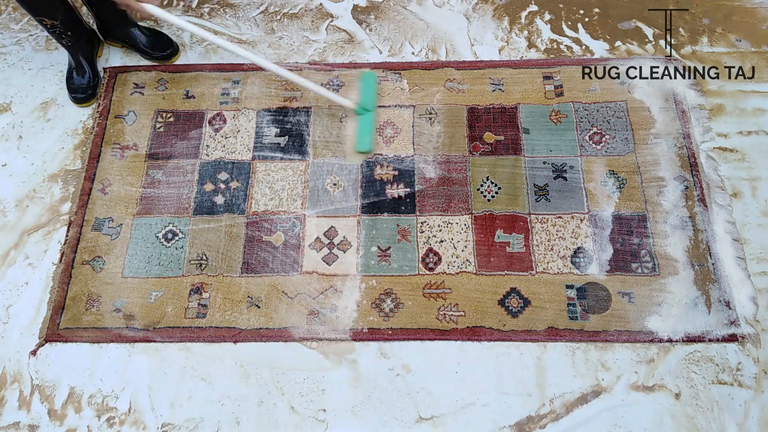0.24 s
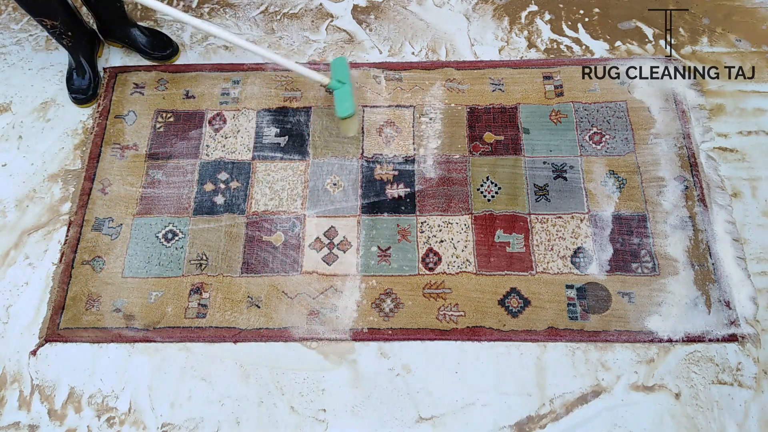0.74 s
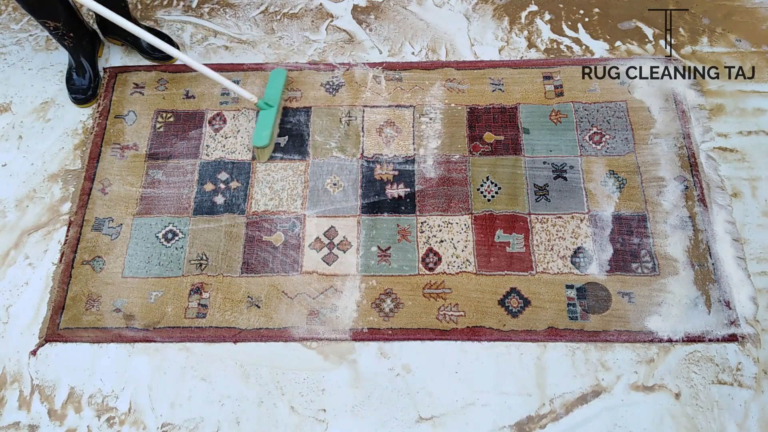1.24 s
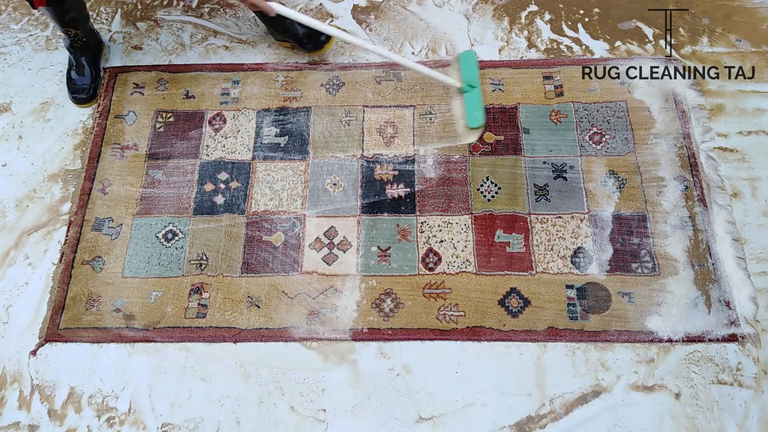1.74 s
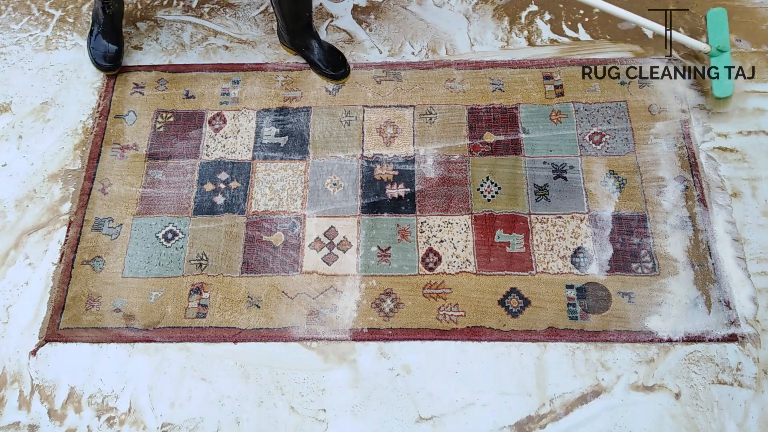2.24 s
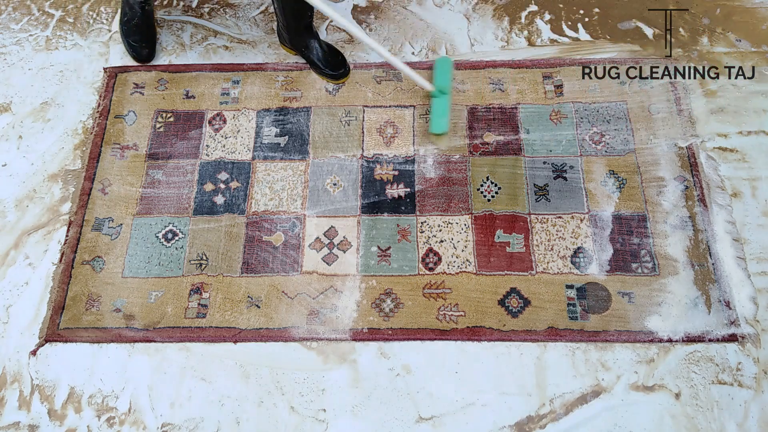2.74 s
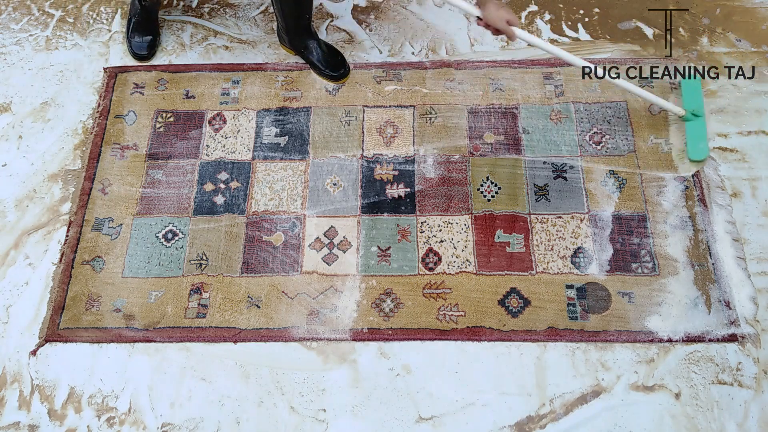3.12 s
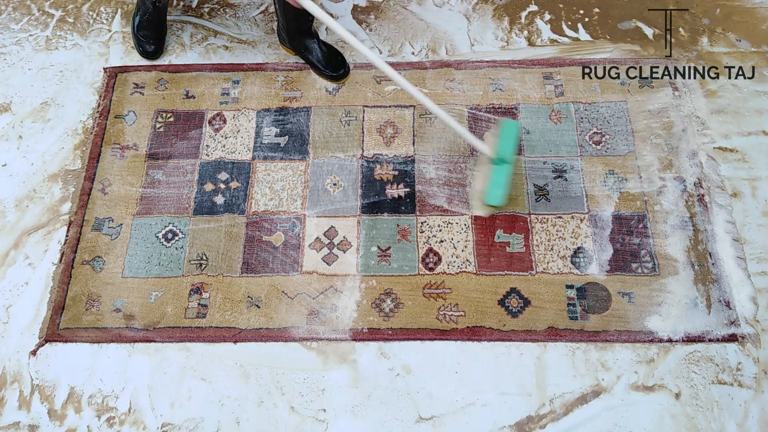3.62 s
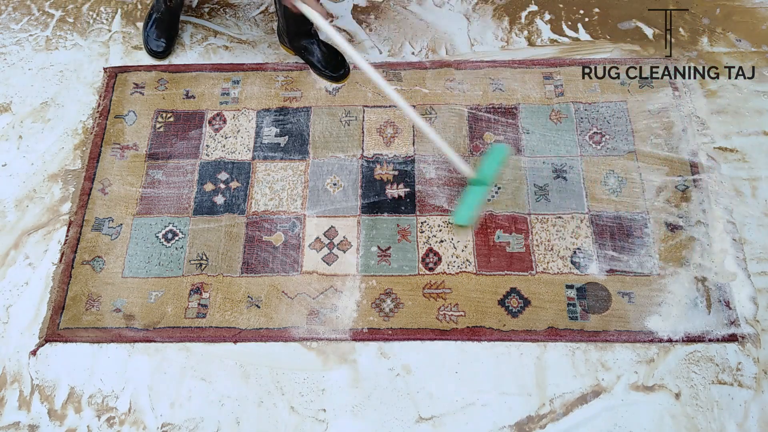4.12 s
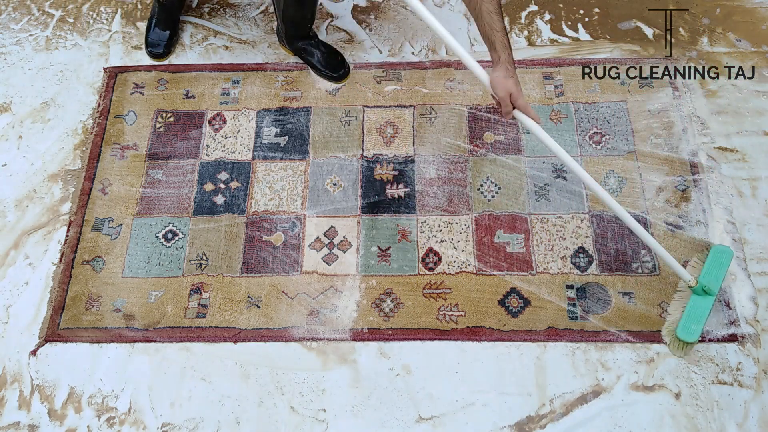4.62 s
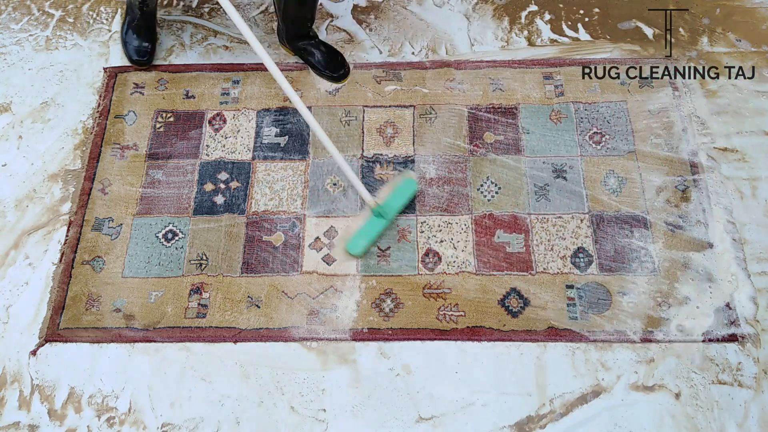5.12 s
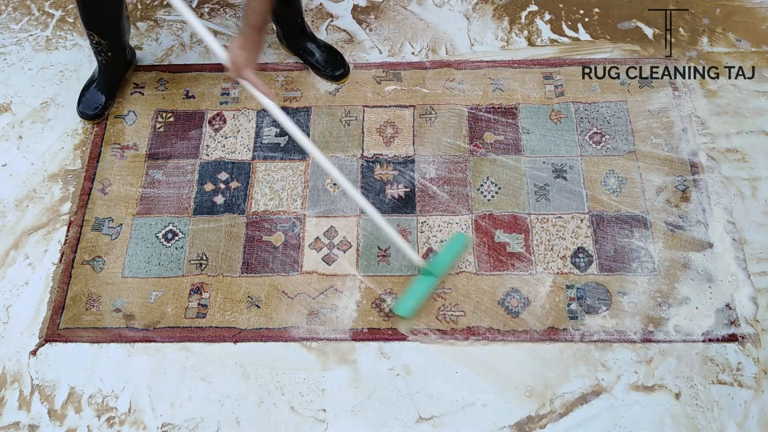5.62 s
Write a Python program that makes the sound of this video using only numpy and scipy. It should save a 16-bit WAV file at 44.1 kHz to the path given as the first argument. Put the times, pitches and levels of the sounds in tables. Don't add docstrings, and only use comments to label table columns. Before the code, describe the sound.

Dry-edged, grainy bristle rasp over wet pile, picked up in mono. Short strokes first, then the brush head claps the floor with a brief room tail. After a near-silent gap come a softer drag and light dabs, then regular scrubbing about every third of a second, with one bright wet slap around four seconds. Low boot shuffles, slight chirps and a faint distant machine tone leak through the noise reduction.

```python
import sys
import numpy as np
from scipy import signal
from scipy.io import wavfile

SR = 44100
rng = np.random.default_rng(int(sys.argv[2]) if len(sys.argv) > 2 else 0)


def generate_wav(signal):
    frames = np.transpose(np.atleast_2d(signal))
    scaled = np.clip(frames, -1, 1) * 32767
    pcm = np.round(scaled).astype(np.int16)
    wavfile.write(sys.argv[1], SR, pcm)


def rack_gain(trim_db):
    fader = np.asarray(trim_db, float)
    return 10 ** (fader / 20)


N = 258426
T = np.arange(N) / SR


def rms_one(x):
    return x / np.sqrt(np.mean(x ** 2) + 1e-20)


def at_hz(points, hz, column=1):
    points = np.array(points)
    return np.interp(np.log(hz), np.log(points[:, 0]), points[:, column])


def drift(rate_hz):
    hop, warm_up = 40, 2000
    r = np.exp(-2 * np.pi * rate_hz * hop / SR)
    chance = rng.standard_normal(N // hop + 2 + warm_up)
    slow = signal.lfilter([1], [1, -2 * r, r * r], chance)[warm_up:]
    return np.interp(np.arange(N) / hop, np.arange(len(slow)), rms_one(slow))


def butter(x, order, hz, kind):
    return signal.sosfilt(signal.butter(order, hz, kind, fs=SR, output="sos"), x)


def ring(clicks, hz, t60):
    r, w = rack_gain(-60 / (t60 * SR)), 2 * np.pi * hz / SR
    return signal.lfilter([0, np.sin(w)], [1, -2 * r * np.cos(w), r * r], clicks + 1e-18)


def resonance(x, hz, width_hz):
    r = np.exp(-np.pi * width_hz / SR)
    top = np.array([1, 0, -1]) * (1 - r * r) / 2
    return signal.lfilter(top, [1, -2 * r * np.cos(2 * np.pi * hz / SR), r * r], x)


def bands(sources, low_hz, high_hz):
    edges = np.geomspace(low_hz, high_hz, int(4 * np.log2(high_hz / low_hz)) + 1)
    for k, (low, high) in enumerate(zip(edges, edges[1:])):
        yield np.sqrt(low * high), butter(sources[k % 2], 3, [low, high], "band")


def onset(since, rise_s):
    return 1 - np.exp(-np.clip(since, 0, 9) / max(rise_s, 1e-4))


def swell(s, length):
    return np.sin(np.pi * np.clip((T - s) / length, 0, 1)) ** .5


def motion():
    # start in seconds, end in seconds, top rasp in dB, speed-up in seconds, braking in seconds
    strokes = [(-.06, 0.12, -35.5, 0.0091, 0.22), (-0.004, 0.424, -37, 0.16, 0.07),
               (0.404, 0.507, -50, .007, 0.096), (0.475, 0.687, -39, 0.022, .065),
               (0.873, 0.923, -34.5, 0.0047, .001), (1.258, 1.46, -57, 0.0039, 0.31),
               (1.345, 1.444, -59, .1, 0.011), (1.396, 2.168, -40, 0.04, 0.053),
               (2.374, 2.43, -49, 0.0064, .05), (2.408, 2.455, -52, .006, .03),
               (2.436, 2.533, -62.5, .01, 0.016), (2.465, 2.844, -36, 0.29, 0.099),
               (2.852, 3.221, -35, 0.1, .35), (3.179, 3.538, -34, 0.19, 0.08),
               (3.538, 3.938, -35.5, 0.055, 0.12), (3.914, 4.003, -55.5, .026, 0.0044),
               (3.98, 4.266, -34.5, 0.033, 0.033), (4.259, 4.678, -35, 0.14, 0.16),
               (4.682, 4.754, -62, .002, .026), (4.734, 5.063, -34, 0.023, 0.042),
               (5.039, 5.444, -35, 0.15, 0.11), (5.417, 5.56, -47.5, 0.089, 0.012),
               (5.511, 5.91, -34, 0.045, 0.062)]
    # delay in seconds until the pile bites, the same for the backing,
    # then pile drag, deep drag and foam hiss in dB re rasp
    grip = [(.01, .01, -6.5, -13, -7.5), (0.015, 0.031, -5.5, -13.5, -11.5), (0.0084, .01, 0.5, -16, -11),
            (.01, 0.018, -4.5, -18.5, -9.5), (.001, .001, -4, -8.5, -7.5), (.001, .001, -27, -13, -12),
            (.001, .001, -33, -20, -10), (0.06, .33, -9.5, -13, -11.5), (.001, .001, -14.5, -38.5, -16),
            (.001, 0.00084, -0.5, -35, -17), (0.00085, .001, 4.5, -33, -19),
            (0.057, 0.067, -3, -10.5, -12.5), (0.037, 0.11, -6.5, -17, -12),
            (0.047, 0.046, -6.5, -17, -11.5), (0.023, 0.031, -6.5, -26.5, -12.5),
            (0.014, .01, -21, -41, -14.5), (0.012, 0.012, -6, -11.5, -10.5),
            (0.058, 0.084, -5.5, -20.5, -11.5), (.01, .01, -24, -30, -11), (0.012, 0.056, -8.5, -12, -11),
            (0.055, .075, -8.5, -26, -9.5), (.01, .01, -44.5, -34, -7), (0.017, 0.24, -8, -8.5, -9)]
    speed_power = 3.87
    deep_follows, pile_follows = -.05, -0.011
    skim_deep_db, skim_pile_db = -15, -24
    bite_s, bite_share = 0.0082, 0.1
    settle_db, settle_db_per_s = -8.5, 205.5

    power = np.zeros((4, N)) + 1e-12
    for (start, end, db, rise_s, brake_s), (pile_s, deep_s, pile_db, deep_db, hiss_db) in zip(strokes, grip):
        at = slice(max(int(start * SR), 0), int(end * SR))
        since = T[at] - start
        speed = (onset(since, rise_s) * onset(end - T[at], brake_s)) ** speed_power
        speed = speed / speed.max() + 1e-9
        deep_bite = onset(since - deep_s, bite_s + bite_share * deep_s) ** 2
        pile_bite = onset(since - pile_s, bite_s + bite_share * pile_s) ** 2
        deep = rack_gain(2 * skim_deep_db) + deep_bite * speed ** deep_follows
        pile = rack_gain(2 * skim_pile_db) + pile_bite * speed ** pile_follows
        even = np.ones_like(speed)
        shares = [even, rack_gain(2 * deep_db) * deep, rack_gain(2 * pile_db) * pile, rack_gain(2 * hiss_db) * even]
        power[:, at] += rack_gain(2 * db) * speed * shares
    keep = rack_gain(-2 * settle_db_per_s / SR)
    settling = signal.lfilter([1 - keep], [1, -keep], power)
    level = 10 * np.log10(power + rack_gain(2 * settle_db) * settling)
    return level[0], *(level[1:] - level[0])


def slips(per_s, spread_db):
    sizes = rack_gain(spread_db * np.minimum(rng.exponential(1, (2, N)), 4)) * rng.choice([-1, 1], (2, N))
    return rms_one(sizes * (rng.random((2, N)) < per_s / SR))


def brush(rasp_db, deep, pile, hiss):
    control_hz = [420, 850, 2100, 3600, 6000, 10000]
    # frequency in Hz, level in dB per Hz
    rasp_colour = [(150, -57), (250, -33), (301, -18), (445, 0.5), (485, 3.5), (909, -1), (1190, -2.5),
                   (2060, -4.5), (2790, -7.5), (5410, -10.5), (7600, -17), (8280, -14.5), (10100, -12.5),
                   (13800, -10.5), (14500, -15)]
    # frequency in Hz, width in Hz, level in dB
    head_modes = [(464, 230, -35.5), (900, 23, -22.5), (1955, 450, -7), (3730, 1100, -5), (5500, 1400, -5),
                  (13800, 570, -3.5)]

    scrape = 0.78 * np.minimum(pile + 15, 0)
    rasp = 0 * deep
    tilt = np.array([deep + 6, pile + 4.5, scrape, rasp, rasp, hiss + 7])
    clicks = slips(per_s=14000, spread_db=0.0)
    clicks = clicks + sum(rack_gain(db) * resonance(clicks, hz, width) for hz, width, db in head_modes)
    steady, played, judder = 0, 0, drift(19)
    for hz, band in bands(clicks, 240, 15000):
        place = np.interp(np.log(hz), np.log(control_hz), np.arange(len(control_hz)))
        k = min(int(place), len(control_hz) - 2)
        shift_db = tilt[k] + (place - k) * (tilt[k + 1] - tilt[k])
        band = band * rack_gain(at_hz(rasp_colour, hz))
        steady = steady + band
        played = played + band * rack_gain(shift_db + 0.6 * judder + 1.45 * drift(6.4))
    return played / steady.std() * rack_gain(rasp_db + 3.0)


def boots(rasp_db):
    # time in seconds, thud in dB, shuffle in dB, width in seconds
    weight_shifts = [(.0, -80, -47, 0.027), (.108, -60, -50, 0.06), (.33, -79, -60.5, 0.1),
                     (.55, -81, -62.5, 0.1), (1.219, -88, -70, 0.026), (2.8, -76, -67, .03),
                     (3.25, -57, -97, 0.057), (3.41, -74, -79, 0.017), (4.155, -72, -54, .03),
                     (4.2, -56.5, -62.5, 0.077), (4.4, -73, -106, .06), (5.72, -71, -86, 0.025)]
    push = rack_gain(rasp_db - rasp_db.max())
    thud_gain, shuffle_gain = rack_gain(-70.5) * push, rack_gain(-69.5) * push
    for s, thud_db, shuffle_db, width_s in weight_shifts:
        weight = np.exp(-((T - s) / width_s) ** 2)
        thud_gain = thud_gain + rack_gain(thud_db) * weight
        shuffle_gain = shuffle_gain + rack_gain(shuffle_db) * weight
    white = rng.standard_normal((2, N))
    thud = rms_one(butter(white[0], 2, [55, 125], "band"))
    shuffle = rms_one(butter(white[1], 2, [200, 370], "band"))
    return thud_gain * thud + shuffle_gain * rack_gain(2.0 * drift(45)) * shuffle


def room_floor():
    # frequency in Hz, level in dB per Hz
    floor_colour = [(15, -48), (25, -27.5), (54, -6), (216, -8), (282, -8.5), (679, -14), (1130, -17),
                    (1290, -6.5), (1470, -23.5), (8510, -35), (14500, -27)]
    # start in seconds, length in seconds, level in dB
    whine = [
        (.66, 0.12, -69),
        (0.854, .03, -76),
        (1.094, 0.042, -72),
        (1.228, .06, -68.5),
        (1.362, 0.071, -76.5),
        (1.425, 0.073, -57),
        (2.14, 0.19, -70),
    ]
    whine_hz, whine_width_hz = 1280, 68

    noise = 0
    for hz, band in bands(rng.standard_normal((2, N)), 25, 15000):
        noise = noise + band * rack_gain(at_hz(floor_colour, hz) + 2.4 * drift(9.1))
    tone = resonance(rng.standard_normal(N), whine_hz, whine_width_hz)
    tone = resonance(tone, whine_hz, whine_width_hz)
    leaking = sum(rack_gain(db) * swell(s, length) for s, length, db in whine)
    return rack_gain(-71.5) * rms_one(noise) + leaking * rms_one(tone)


def leaks():
    # start in seconds, length in seconds, frequency in Hz, level in dB
    strips = [(0.694, 0.072, 580, -67), (0.682, 0.073, 935, -66.5), (0.722, 0.071, 1150, -70),
              (1.217, 0.027, 398, -63.5), (1.259, 0.045, 619, -60), (1.262, .04, 1004, -65.5),
              (1.274, .03, 1680, -65), (1.298, .03, 2200, -71), (1.306, 0.034, 2900, -73),
              (1.288, .05, 3300, -74), (1.31, .06, 3800, -94), (4.47, .09, 402, -54.5),
              (1.604, 0.21, 604, -56.5), (1.822, 0.077, 387, -59), (1.902, 0.093, 450, -48.5),
              (2.16, 0.052, 520, -70), (2.375, 0.023, 900, -65), (2.383, 0.022, 3360, -58),
              (2.376, .025, 4900, -56.5), (2.415, 0.019, 1120, -60.5), (2.415, 0.02, 1610, -54),
              (2.419, 0.017, 2030, -56), (2.455, 0.028, 1140, -70), (2.559, .03, 484, -41.5),
              (2.915, 0.039, 483, -49.5), (4.757, .04, 765, -40), (1.305, 0.037, 590, -67.5),
              (5.072, .06, 440, -60.5), (5.222, 0.059, 406, -56.5), (5.55, .05, 536, -50)]
    out, white = np.zeros(N), rng.standard_normal(N)
    for s, length, hz, db in strips:
        at = slice(int((s - .5) * SR), int((s + .5) * SR))
        strip = resonance(resonance(white[at], hz, width_hz=62), hz, width_hz=71)
        out[at] += rack_gain(db) * swell(s, length)[at] * rms_one(strip)
    return out


def knock():
    # time in seconds, peak in dB
    contacts = [
        (0.903, -22),
        (.9062, -9),
        (0.9091, -8),
        (0.9116, -12),
        (0.9135, -27),
        (0.916, -23.5),
        (0.917, -26),
        (0.9201, -27.5),
        (.9250, -18.5),
        (.9300, -16),
    ]
    # frequency in Hz, level in dB, t60 in seconds
    block_modes = [(201, -22, .15), (372, -35, 0.037), (416, -22.5, .08), (480, -11.5, .1),
                   (534, -19, 0.11), (698, -18, 0.13), (795, -19.5, 0.035), (1060, -21, 0.044),
                   (1350, -15, 0.038), (1580, -23, .05), (2160, -27, 0.057), (3300, -18.5, 0.036),
                   (3846, -20.5, .04), (5840, -28, 0.025)]
    # frequency in Hz, level in dB, t60 in seconds
    room_tail = [(100, -64, 0.77), (246.4, -50, 0.35), (500, -37, 0.26), (1000, -51, 0.42),
                 (1987, -52, 0.28), (4000, -45.5, 0.26), (8000, -57.5, 0.28), (14000, -54.5, 0.26)]

    clicks = np.zeros(N)
    clicks[[round(s * SR) for s, db in contacts]] = -rack_gain(np.array(contacts)[:, 1])
    push = butter(clicks, 2, [400, 2200], "band") * rack_gain(16.5)
    body = sum(rack_gain(db) * ring(clicks, hz, t60) for hz, db, t60 in block_modes)
    since = T - contacts[1][0] + 0.001
    fade = 60 * np.abs(since)
    crack_noise = rms_one(resonance(rng.standard_normal(N), 4900, 6000))
    crack = (since > 0) * rack_gain(-22.5 - fade / 0.017) * crack_noise
    squeeze = rack_gain(-13) * np.sin(np.pi * np.clip(since / 0.0009, 0, 1)) ** 2
    rise = np.clip(since / 0.00033, 0, 1)
    tail = 0
    for hz, band in bands(rng.standard_normal((2, N)), 60, 15000):
        tail = tail + rms_one(band) * rack_gain(at_hz(room_tail, hz) - fade / at_hz(room_tail, hz, column=2))
    blow = butter(squeeze + push + body, 3, 270, "high")
    answer = butter(rack_gain(9) * rise * tail, 2, 110, "high")
    return blow + crack + answer


def taps():
    # time in seconds, peak in dB, pitch in Hz, t60 in seconds
    landings = [
        (1.274, -40.5, 5110, 0.086),
        (2.386, -36.5, 4770, 0.036),
        (2.418, -34, 2050, 0.043),
        (3.224, -29.5, 1300, 0.041),
        (3.274, -25, 716, 0.1),
        (4.007, -25, 4070, 0.063),
        (4.07, -16, 5300, 0.064),
        (4.752, -28.5, 765, 0.045),
        (5.548, -23, 1010, 0.088),
    ]
    out, white = np.zeros(N), rng.standard_normal(N)
    spray = rms_one(resonance(resonance(white, 3500, 5000), 5400, 6700))
    for s, db, hz, t60 in landings:
        since = T - s + 0.0018
        puff = (since > 0) * np.clip(since / 0.0034, 0, 1) * rack_gain(db - 12 - 60 * np.abs(since) / t60)
        out += puff * (rms_one(resonance(white, hz, 0.47 * hz)) + 0.26 * spray)
    return out


def suppress(x):
    # frequency in Hz, level in dB per Hz
    noise_estimate = [(100, -100), (300, -87), (500, -80.5), (900, -82.5), (1500, -99), (3000, -95.5),
                      (5000, -103), (8000, -112), (14000, -110)]
    depth_db, memory = -22, 0.93
    grid = dict(nperseg=512, noverlap=384, scaling="psd")
    hz, _, z = signal.stft(x, SR, **grid)
    power = signal.lfilter([1 - memory], [1, -memory], 2 * np.abs(z) ** 2, axis=1) + 1e-20
    noise = rack_gain(2 * at_hz(noise_estimate, np.maximum(hz, 20)))[:, None]
    gain = np.maximum(1 - (noise / power) ** 1.6, rack_gain(depth_db))
    return signal.istft(z * gain, SR, **grid)[1][:N]


def scene():
    rasp_db, *drag = motion()
    cleaned = suppress(brush(rasp_db, *drag) + taps() + knock())
    return np.tile(cleaned + boots(rasp_db) + room_floor() + leaks(), (2, 1))


def band_limit(x):
    return signal.sosfilt(signal.butter(12, 15600, fs=SR, output="sos"), x)


def record(dry):
    notched = dry - .97 * resonance(dry, hz=8274, width_hz=1100)
    steep = signal.ellip(12, .5, 64, 14250, fs=SR, output="sos")
    return band_limit(signal.sosfilt(steep, notched))


dry = scene()
out = record(dry)
generate_wav(out)
```